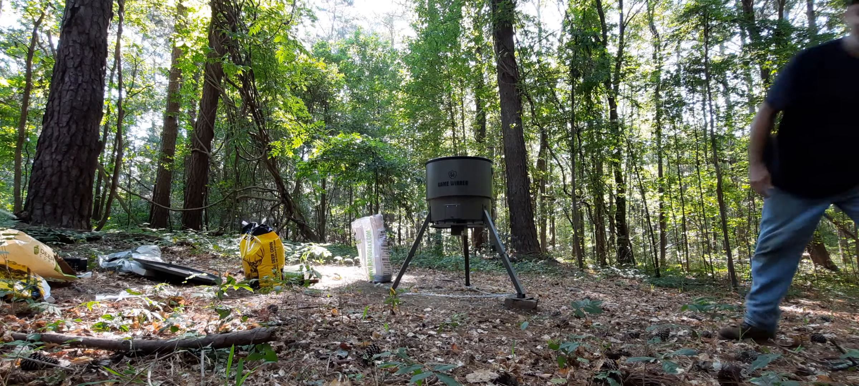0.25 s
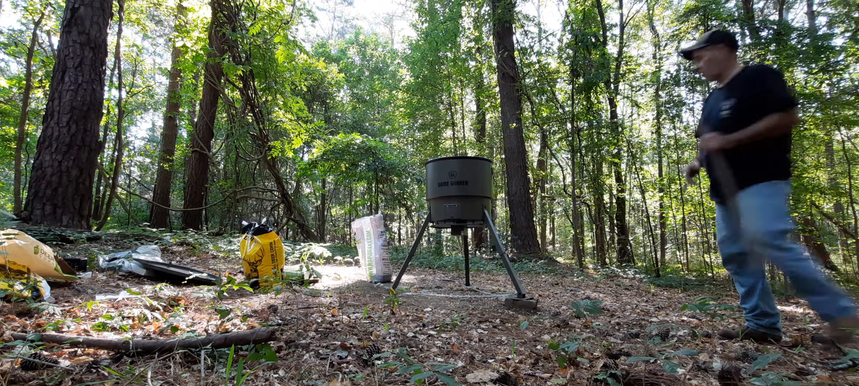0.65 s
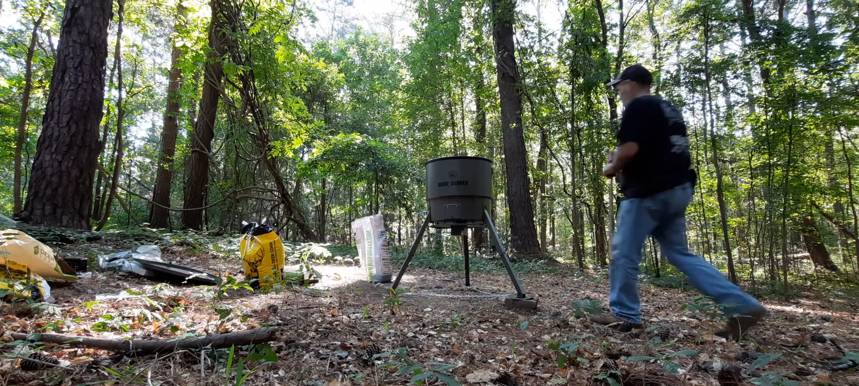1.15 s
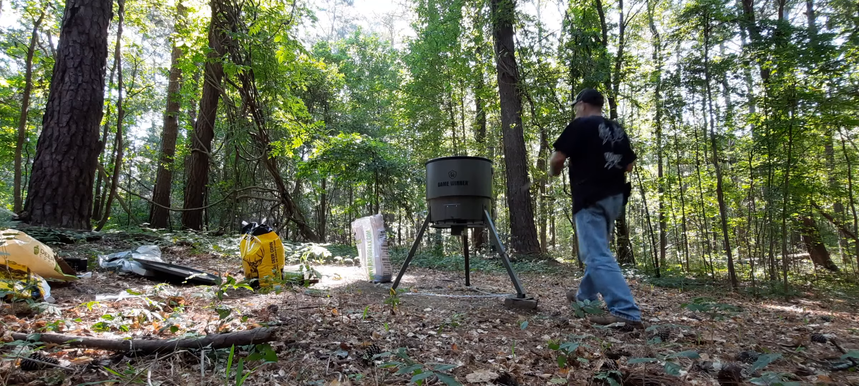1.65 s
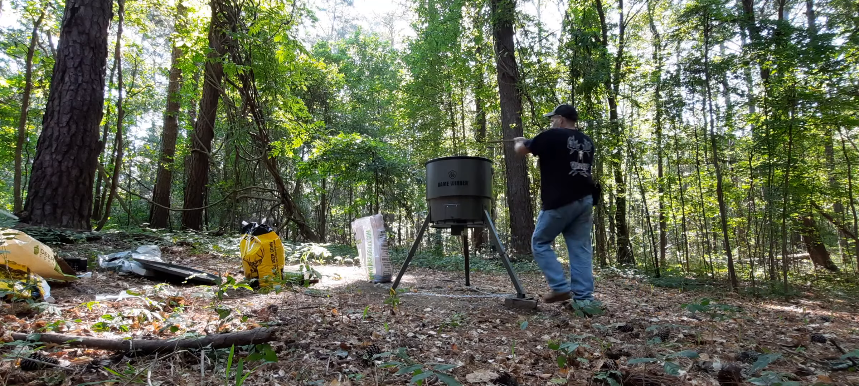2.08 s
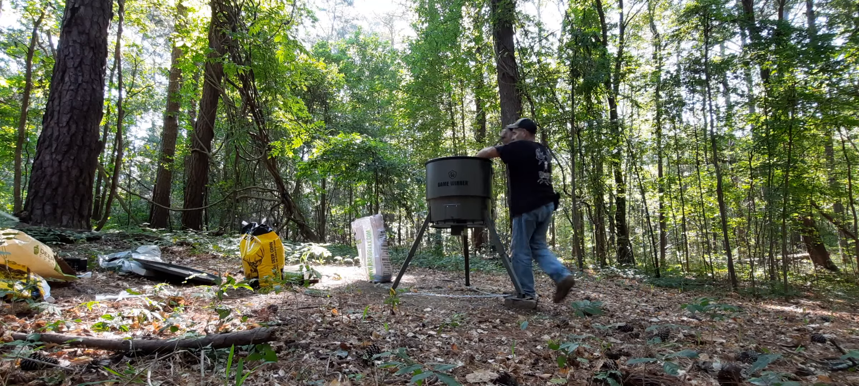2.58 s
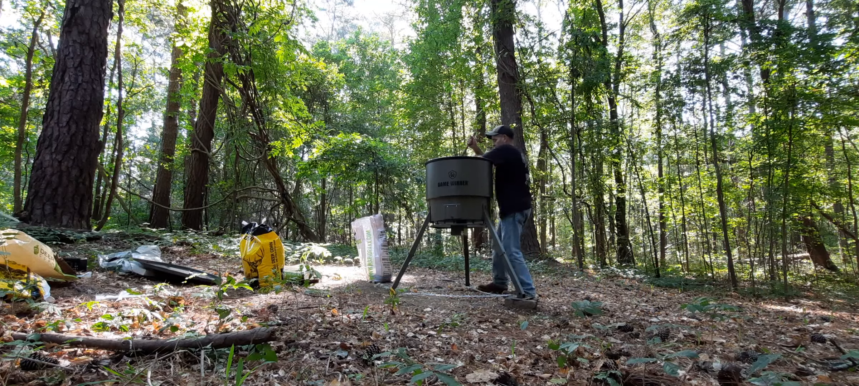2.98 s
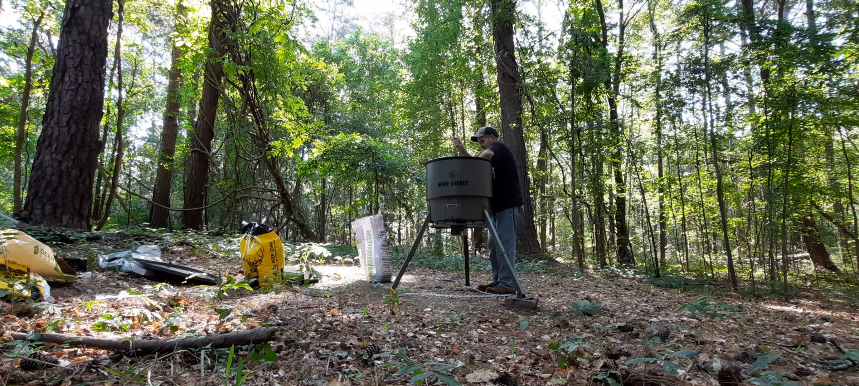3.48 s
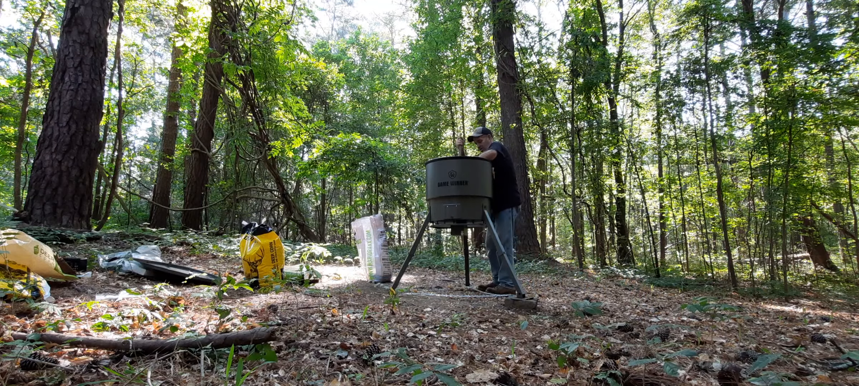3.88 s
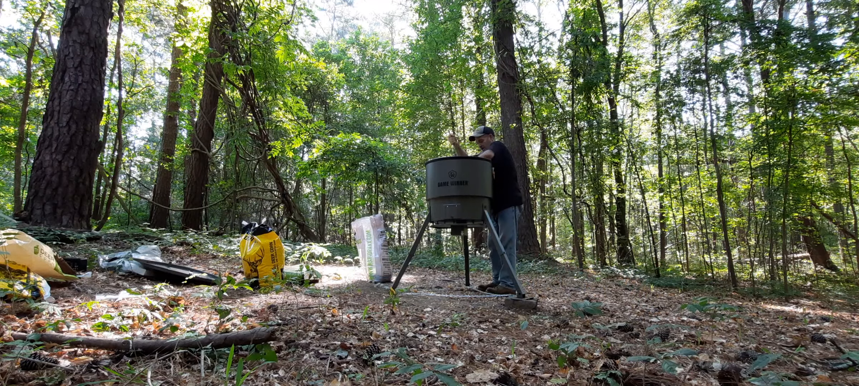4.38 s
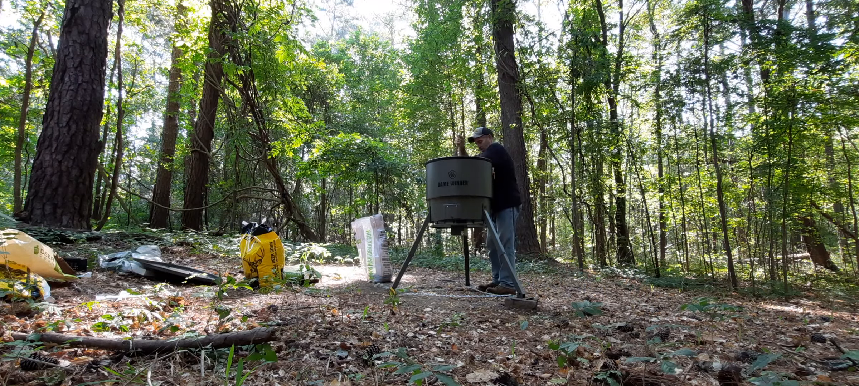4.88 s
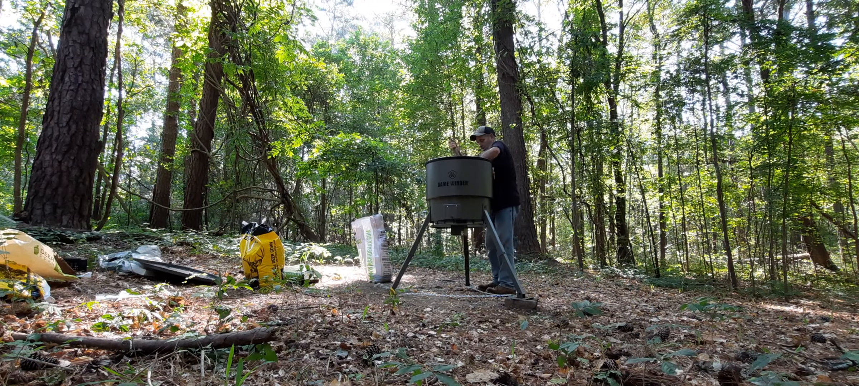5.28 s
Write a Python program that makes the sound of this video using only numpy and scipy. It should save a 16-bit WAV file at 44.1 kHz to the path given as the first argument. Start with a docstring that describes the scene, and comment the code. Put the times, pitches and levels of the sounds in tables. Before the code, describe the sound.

In a wood, insects throb faintly over a low rumble and far birds give a few falling whistles. Footsteps crunch through leaf litter with sharp twig cracks, then stop. In front of the microphone, dried corn and seed spill from a shaken, crackling sack into a metal drum, clattering in uneven surges that grow louder, with a hollow boom underneath.

```python
"""Filling a drum feeder in a wood

Insects shrill, far birds echo among the trunks, and a low rumble lies under everything. A man crosses
dry leaf litter, which fractures underfoot, then tips a sack of dried corn and seed into a steel drum.
The feed comes in surges: the sack crinkles, kernels clatter in and patter on the heap, and their
impacts excite the drum's hollow modes (a boom) and the modes of its wall (a ring)."""
import sys
import numpy as np
from scipy import signal
from scipy.fft import rfft, irfft
from scipy.io import wavfile

SR = 44100
rng = np.random.default_rng(int(sys.argv[2]) if len(sys.argv) > 2 else 0)


def dump(signal):
    """Clip the signal to [-1, 1] and save it as 16-bit WAV at the path in sys.argv[1]."""
    limited = np.clip(np.atleast_2d(signal).T, -1, 1)
    pcm = np.round(limited * 32767).astype(np.int16)
    wavfile.write(sys.argv[1], SR, pcm)


N = 244314
TIME = np.arange(N) / SR
BINS_HZ = np.maximum(np.fft.rfftfreq(2 ** 18, 1 / SR), 1)

# Levels are relative: each source applies its own gain.
# coherence of the two microphones for near and far sound: frequency_hz, coherence (0-1)
NEAR_COHERENCE = [(60, .96), (300, .98), (1400, .92), (3100, .74), (5500, .42), (9500, .17), (11500, .15),
                  (13500, .42), (15500, .48)]
FAR_COHERENCE = [(60, 0.89), (130, 0.98), (290, 0.75), (640, 0.04), (1400, 0.011), (16000, 0.016)]
# left microphone's excess over the right for frontal sound: frequency_hz, excess_db
LEFT_EXCESS = [(100, 0.5), (1500, 2.5), (3300, 2.5), (5500, -0.5), (8000, -0.5), (10400, 5.5), (13000, 3),
               (16000, -1)]

# spectra of the rumble, the air and the insects: frequency_hz, density_db
RUMBLE_SPECTRUM = [(15, -60), (25, -33), (51, -9), (102, -1), (123, 0), (140, -15.5), (193, -10),
                   (214, -36), (295, -14.5), (420, -38), (550, -49), (920, -120)]
AIR_SPECTRUM = [(200, 2.5), (450, -7.5), (1000, -1), (1700, -2), (2800, -7.5), (4300, -15.5), (7000, -9.5),
                (9500, -19.5), (16000, -26)]
INSECT_SPECTRUM = [(4700, -24), (5300, -6.5), (5550, 5.5), (5780, 3), (6050, -9.5), (6700, -13.5)]
# envelope of the far rumble: time_s, level_db
RUMBLE_ENVELOPE = [(0, -70.5), (.15, -61), (1.35, -61), (2.1, -60), (2.35, -64), (2.65, -56.5),
                   (3.2, -60.5), (5.54, -56)]
# falling notes of far birds: start_s, length_s, first_hz, last_hz, level_db
BIRD_NOTES = [(.0, 0.49, 3514, 3020, -62.5), (.12, 0.33, 2600, 2345, -73), (.68, 0.2, 8700, 8600, -83),
              (1.4, 0.16, 1675, 1550, -65.5), (1.42, .19, 2140, 1620, -66), (2.68, .16, 3080, 2900, -72)]

# boots pressing the leaves: start_s, hold_s, level_db
FOOTFALLS = [(.2, 0.17, -70), (.85, 0.13, -51), (.96, 0.084, -45.5), (1.25, 0.048, -69), (1.49, 0.007, -71),
             (1.66, 0.034, -67.5), (1.9, 0.016, -64), (2.0, 0.044, -61.5), (2.38, 0.023, -75)]
# twigs and dry leaves breaking: start_s, peak_db
TWIG_SNAPS = [(0.8486, -31), (0.8616, -35), (0.9655, -30), (0.9962, -34), (1.0125, -26.5), (1.0394, -33),
              (1.9808, -34), (1.9844, -30), (1.9882, -30), (2.1803, -57), (2.3958, -55), (2.734, -51),
              (2.8211, -52)]
# spectra of crushed leaves and of a breaking twig: frequency_hz, density_db
LEAF_SPECTRUM = [(150, 0), (420, 1.5), (700, -7), (1500, -4.5), (2400, -2), (4000, -1.5), (7000, -2.5),
                 (9500, -6), (13000, 2.5), (18000, -21)]
TWIG_SPECTRUM = [(250, -8), (380, -6), (600, -18), (1000, -11), (1800, -7), (3600, -17), (5800, -1),
                 (9500, -5), (12500, 3), (18000, -1)]

# flow out of the sack, as the level of its clatter: time_s, level_db
FEED_FLOW = [(2.88, -71), (2.97, -52.5), (3.03, -67), (3.11, -47.5), (3.23, -56), (3.5, -57), (3.65, -45.5),
             (3.85, -44), (3.87, -39.5), (4.11, -51), (4.26, -47), (4.32, -40), (4.4, -46), (4.67, -41),
             (4.69, -38.5), (4.84, -36.5), (4.93, -43), (5.35, -49), (5.46, -38.5), (5.48, -42.5),
             (5.54, -38.5)]
# slugs of feed dropping onto the heap: start_s, hold_s, level_db
FEED_SLUGS = [(3.1, 0.1, -66), (3.62, 0.19, -42.5), (3.915, 0.044, -38), (4.58, .03, -42.5),
              (4.70, .06, -36), (5.41, 0.097, -39.5)]
# spectra of the heap's patter, the kernels' clatter and the seed's hiss: frequency_hz, density_db
PATTER_SPECTRUM = [(1000, -9.5), (1130, 3), (1260, 1), (1600, -2), (1850, -3.5), (2150, -17.5)]
CLATTER_SPECTRUM = [(2050, -1.5), (2250, -0.5), (2700, -1), (2950, -2), (3500, -5), (3950, -4),
                    (4500, -6.5)]
SEED_SPECTRUM = [(4200, -12), (5000, -1), (6300, 2.5), (7500, 3), (9000, 1), (10500, 1)]
# weight of feed landing in the drum, as the level of its boom: time_s, level_db
DRUM_LOAD = [(2.88, -75), (2.96, -57.5), (3.03, -65), (3.12, -56.5), (3.5, -56), (3.6, -50), (3.85, -50.5),
             (3.95, -47), (4.2, -44), (4.31, -52.5), (4.43, -45), (4.58, -47), (4.74, -43.5), (5.0, -43.5),
             (5.13, -56.5), (5.22, -45.5), (5.33, -48), (5.44, -45), (5.54, -50.5)]
# modes of the steel wall, the hollow drum and the air inside: pitch_hz, bandwidth_hz, level_db
WALL_MODES = [(1260, 10, 0), (1495, 20, -3), (1604, 22, -3), (2343, 16, -9), (2589, 16, -4), (3079, 20, -8),
              (3423, 22, -5), (3590, 40, -5)]
DRUM_MODES = [(110, 32, -2), (153.5, 25.5, 4.5), (189, 26, -9), (256, 26, -38), (328.6, 62, 7.5),
              (425, 510, -25)]
CAVITY_MODES = [(781, 124, 1), (1028, 112, 2.5)]

# shakes of the sack: start_s, hold_s, level_db
SACK_SHAKES = [(2.92, 0.074, -52), (3.08, 0.048, -42), (3.27, .04, -50.5), (3.625, 0.032, -35.5),
               (3.71, .1, -37), (3.93, 0.059, -42), (4.255, .03, -42.5), (4.3, 0.061, -31.5),
               (4.38, 0.21, -39.5), (4.68, 0.11, -34), (5.03, 0.043, -38.5), (5.16, 0.024, -33.5),
               (5.325, 0.029, -41.5), (5.52, .02, -39)]
# sharp creases snapping in the sack: start_s, peak_db
CREASE_SNAPS = [(2.92, -39), (3.0664, -33), (3.0907, -29), (3.2547, -35), (3.6398, -23), (4.1995, -29),
                (4.2472, -21), (4.2692, -23), (4.2915, -17.5), (4.3099, -19), (4.9947, -25), (5.0621, -19),
                (5.0666, -24), (5.1474, -28), (5.3217, -31)]
# spectra of the sack's fine crinkle and of one crease: frequency_hz, density_db
CRINKLE_SPECTRUM = [(1500, -30), (4000, -22), (7000, -19), (9500, -14), (11500, -4), (13500, 0), (15500, 0),
                    (18000, 0)]
CREASE_SPECTRUM = [(900, -15), (5000, -10), (9500, -9), (13000, 1), (18000, 3)]

FULL_FLOW_DB, WALK_ENDS_S, CUTOFF_HZ = -35, 2.9, 15850


def from_db(db):
    """Amplitude grows tenfold for every 20 decibels."""
    return 10 ** (np.asarray(db) / 20)


def rms_one(x):
    """Normalisation to unit mean power."""
    return x / np.sqrt(np.mean(x ** 2) + 1e-20)


def envelope(rows):
    """Amplitude envelope, interpolated in decibels and silent outside its span."""
    time_s, level_db = np.transpose(rows)
    return from_db(np.interp(TIME, time_s, level_db)) * (TIME >= time_s[0]) * (TIME <= time_s[-1] + .01)


def swells(rows, attack_s, release_s):
    """Incoherent events add in power; each rises exponentially, holds and decays."""
    power = 0
    for start_s, hold_s, level_db in rows:
        before = np.maximum(start_s - TIME, 0) / attack_s
        after = np.maximum(TIME - start_s - hold_s, 0) / release_s
        power = power + (from_db(level_db) * np.exp(-np.minimum(before + after, 30))) ** 2
    return np.sqrt(power)


def drift(rate_hz):
    """Random modulation of unit power, lying mostly below the given rate."""
    knots = rng.standard_normal(4096)
    return rms_one(np.interp(TIME * rate_hz * 2, np.arange(len(knots)), knots))


def over_hz(points):
    """Interpolation on a logarithmic frequency axis."""
    hz, value = np.transpose(points)
    return np.interp(np.log(BINS_HZ), np.log(hz), value)


def filtered(x, response):
    """Linear filtering multiplies the spectrum by a frequency response."""
    size = 2 * (len(BINS_HZ) - 1)
    return irfft(rfft(x, size) * response, size)[..., :N]


def coloured(x, spectrum):
    """Spectral shaping by a table, falling 24 dB an octave beyond its ends."""
    inside = np.minimum(BINS_HZ / spectrum[0][0], 1) * np.minimum(spectrum[-1][0] / BINS_HZ, 1)
    return filtered(x, from_db(over_hz(spectrum)) * inside ** 4)


def noise_pair(coherence):
    """Partially coherent noise at two microphones: a common part plus and minus a side part."""
    alike = np.clip(over_hz(coherence), 0, .999)
    mid, side = filtered(rng.standard_normal((2, N)), np.sqrt([1 + alike, 1 - alike]))
    return mid + side * [[1], [-1]]


def diffuse_noise(spectrum):
    """A diffuse field is coherent between two microphones only at long wavelengths."""
    return rms_one(coloured(noise_pair(FAR_COHERENCE), spectrum))


def decay(energy, t60_s):
    """Damping: the amplitude envelope of contacts whose energy decays exponentially."""
    return np.sqrt(signal.lfilter([1], [1, -10 ** (-6 / (t60_s * SR))], energy + 1e-18))


def grains(per_s, spread_db, t60_s, scatter):
    """Shot noise: random tiny impacts of uneven size over a steady scattered wash."""
    hits = rng.random(N) < per_s / SR
    sizes = from_db(spread_db * np.clip(rng.standard_normal(N), -1.7, 1.7))
    cracks = rms_one(decay(hits * sizes ** 2, t60_s))
    return noise_pair(NEAR_COHERENCE) * np.sqrt(cracks ** 2 + scatter ** 2)


def snaps(rows, t60_s, tail_t60_s, tail_db, spectrum):
    """Sudden release of energy gives a sharp crack, and scattering a short tail."""
    energy = np.zeros(N)
    for start_s, peak_db in rows:
        energy[int(start_s * SR)] += from_db(peak_db) ** 2
    crack = np.sign(noise_pair(NEAR_COHERENCE)) * decay(energy, t60_s)
    tail = from_db(tail_db) * noise_pair(NEAR_COHERENCE) * decay(energy, tail_t60_s)
    return coloured(crack + tail, spectrum)


def resonate(x, modes):
    """Modal superposition: damped resonators in parallel, with alternating signs."""
    out = 0
    for k, (pitch_hz, bandwidth_hz, level_db) in enumerate(modes):
        r = np.exp(-np.pi * bandwidth_hz / SR)
        poles = [1, -2 * r * np.cos(2 * np.pi * pitch_hz / SR), r * r]
        out = out + (-1) ** k * from_db(level_db) * (1 - r * r) / 2 * signal.lfilter([1, 0, -1], poles, x)
    return rms_one(out)


def background():
    """Diffuse noise: a far rumble that swells and sinks under soft, steady air."""
    rumble = envelope(RUMBLE_ENVELOPE) * diffuse_noise(RUMBLE_SPECTRUM)
    return rumble + from_db(-67.5) * diffuse_noise(AIR_SPECTRUM)


def insects(throb_hz=11.1):
    """Amplitude modulation of a narrow noise band makes the chorus throb."""
    throb_db = 2.2 * np.sin(2 * np.pi * throb_hz * TIME + .6 * drift(rate_hz=1.5))
    return from_db(-66.5 + throb_db) * diffuse_noise(INSECT_SPECTRUM)


def birds():
    """Frequency modulation: far whistles glide down with an unsteady quaver, then reverberate."""
    calls = 0
    for start_s, length_s, first_hz, last_hz, level_db in BIRD_NOTES:
        along = np.clip((TIME - start_s) / length_s, 0, 1)
        glide_hz = first_hz + (last_hz - first_hz) * along ** 1.3   # the fall steepens
        pitch_hz = glide_hz * (1 + .022 * drift(rate_hz=170))
        level = from_db(level_db) * np.sin(np.pi * along) ** 2
        calls = calls + level * np.sqrt(2) * np.sin(2 * np.pi * np.cumsum(pitch_hz) / SR)
    return from_db(-6) * calls + from_db(-6.5) * trees(calls, t60_s=1.5, dull_hz=5000)


def trees(x, t60_s, dull_hz):
    """Multiple scattering from trunks gives a dull reverberation, different at each microphone."""
    age = TIME[:2 * SR]
    build_up = 1 - np.exp(-age / 0.0048)
    echoes = rng.standard_normal((2, len(age))) * from_db(-60 * age / t60_s) * build_up
    echoes = signal.sosfilt(signal.butter(1, dull_hz, fs=SR, output="sos"), echoes)
    return signal.fftconvolve(np.atleast_2d(x), rms_one(echoes) / np.sqrt(len(age)), axes=1)[:, :N]


def boots():
    """Brittle fracture: leaves crush in a spray of small cracks and twigs break under the soles."""
    shuffle = from_db(-74.5) * (TIME < WALK_ENDS_S)   # leaves stir between the steps
    pressure = swells(FOOTFALLS, attack_s=0.0043, release_s=0.045) + shuffle
    cracks = grains(per_s=660, spread_db=3, t60_s=0.0044, scatter=1.0)
    leaves = pressure * rms_one(coloured(cracks, LEAF_SPECTRUM))
    twigs = snaps(TWIG_SNAPS, t60_s=.008, tail_t60_s=.05, tail_db=-23, spectrum=TWIG_SPECTRUM)
    return (from_db(.5) * leaves + from_db(3) * twigs) * from_db([[-1], [1]])   # louder on the right


def pour():
    """Amplitudes follow power laws of the flow; slugs add to the patter and shakes to the crinkle."""
    clatter = envelope(FEED_FLOW)
    flow = clatter / from_db(FULL_FLOW_DB)
    slugs = swells(FEED_SLUGS, attack_s=0.053, release_s=0.022)
    shakes = swells(SACK_SHAKES, attack_s=0.016, release_s=0.031)
    patter = np.hypot(from_db(-39.5) * flow ** 0.78, slugs)
    crinkle = np.hypot(from_db(-30) * flow ** 1.214, shakes)
    return flow, patter, clatter, crinkle


def feed(patter, clatter, crinkle):
    """Granular impact: kernels strike each other, the heap and the wall, more often in heavier flow."""
    fullness = clatter / clatter.max()
    per_s = 700 + 3000 * fullness
    landings = grains(per_s, spread_db=1.5, t60_s=0.0019, scatter=0.57)
    heap = patter * rms_one(coloured(landings, PATTER_SPECTRUM))
    impacts = grains(per_s, spread_db=3.5, t60_s=0.0067, scatter=0.89)
    kernels = clatter * rms_one(coloured(impacts, CLATTER_SPECTRUM))
    # small seed skids over the sack's lip; hard surges drum brightly on the steel
    seeds = np.sqrt(clatter * crinkle) * rms_one(coloured(impacts, SEED_SPECTRUM))
    surge = clatter * fullness * resonate(impacts, [(3440, 370, 0)])
    strikes = grains(per_s, spread_db=12, t60_s=0.006, scatter=0.24)
    ring = np.sqrt(patter * clatter) * resonate(strikes, WALL_MODES)
    stream = from_db(-3) * heap + from_db(-0.13) * kernels + from_db(-3.5) * seeds + from_db(-10) * surge
    return wall_echoes(stream, strength=.27) + from_db(-8.5) * ring


def wall_echoes(x, strength, sway=.12):
    """Comb filtering by two echoes across the drum, whose paths shift as the stream wanders."""
    out = x
    for delay_s in (.0013, .003):
        earlier = TIME - delay_s * (1 + sway * drift(rate_hz=2.5))
        out = out + strength * np.array([np.interp(earlier, TIME, side) for side in x])
    return out / np.sqrt(1 + 2 * strength ** 2)


def drum(flow):
    """Forced vibration: clumps make the drum boom and shudder; sliding feed excites the air inside."""
    load = envelope(DRUM_LOAD)
    clumps = grains(per_s=300, spread_db=2, t60_s=0.009, scatter=0.96)
    boom = load * resonate(clumps, DRUM_MODES)
    shudder = (load / load.max()) ** 0.29 * diffuse_noise(RUMBLE_SPECTRUM)   # it shakes on its legs
    heaped = np.clip((TIME - FEED_FLOW[0][0]) / .5, 0, 1)   # sliding sets in as the heap builds
    rubbing = grains(per_s=1200, spread_db=1, t60_s=0.006, scatter=0.7)
    slide = heaped * flow ** 0.44 * resonate(rubbing, CAVITY_MODES)
    return from_db(1.5) * boom + from_db(-54) * shudder + from_db(-47.5) * slide


def sack(crinkle):
    """Buckling: the stiff sack crackles as it is shaken and emptied, with a few sharper creases."""
    per_s = 400 + 2000 * crinkle / crinkle.max()
    buckles = grains(per_s, spread_db=5, t60_s=0.024, scatter=0.67)
    crackle = crinkle * rms_one(coloured(buckles, CRINKLE_SPECTRUM))
    creases = snaps(CREASE_SNAPS, t60_s=.006, tail_t60_s=.06, tail_db=-17, spectrum=CREASE_SPECTRUM)
    return wall_echoes(from_db(.3) * crackle + from_db(4) * creases, strength=.2)


def from_front(x, lag_ms):
    """Path difference delays sound from the right at the left microphone; the housing shades some bands."""
    half_excess_db = over_hz(LEFT_EXCESS) / 2
    delay = np.exp(-2j * np.pi * BINS_HZ * lag_ms / 1000)
    return filtered(x, np.array([from_db(half_excess_db) * delay, from_db(-half_excess_db)]))


def scene():
    """Superposition in the wood: the feeder ahead, the sack on its right, the steps farther right."""
    flow, patter, clatter, crinkle = pour()
    feeder = from_front(feed(patter, clatter, crinkle) + drum(flow), lag_ms=.045)
    near = feeder + from_front(sack(crinkle), lag_ms=.072) + from_front(boots(), lag_ms=.2)
    echoes = from_db(-19) * trees(near, t60_s=0.44, dull_hz=4030)
    return near + echoes + background() + insects() + birds()


def record(dry):
    """Band limiting: a steep low-pass filter removes the highest treble."""
    return signal.sosfilt(signal.ellip(12, .1, 80, CUTOFF_HZ, fs=SR, output="sos"), dry)


dry = scene()
out = record(dry)
dump(out)
```